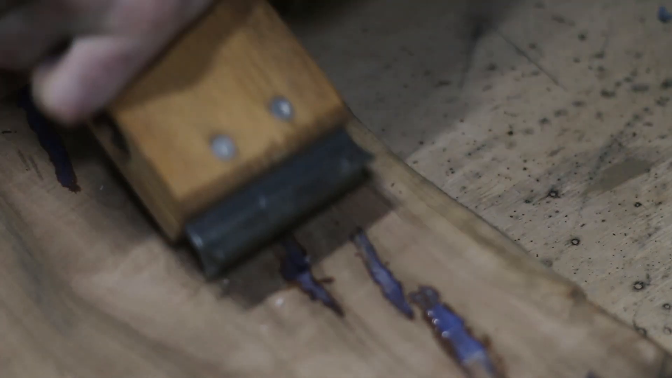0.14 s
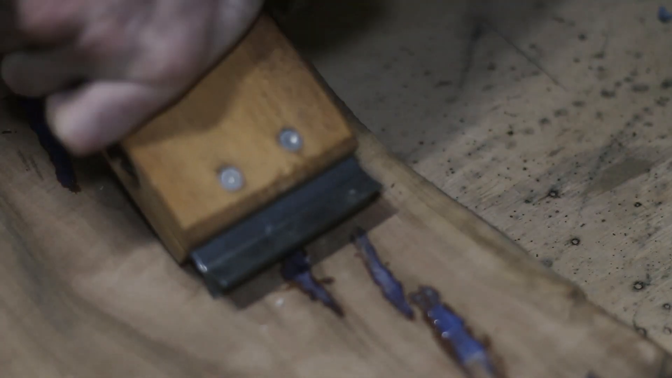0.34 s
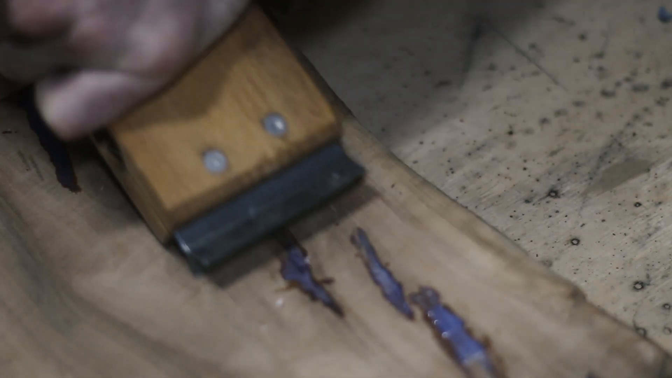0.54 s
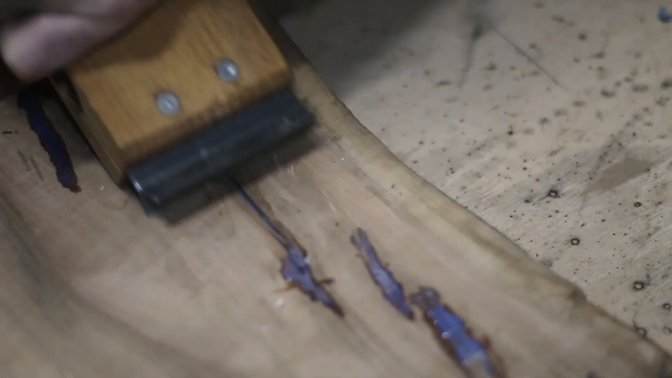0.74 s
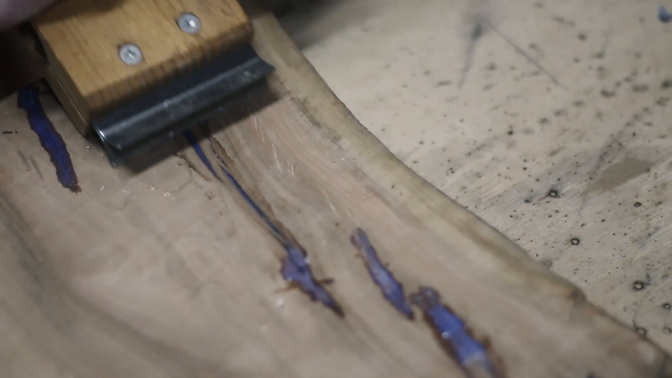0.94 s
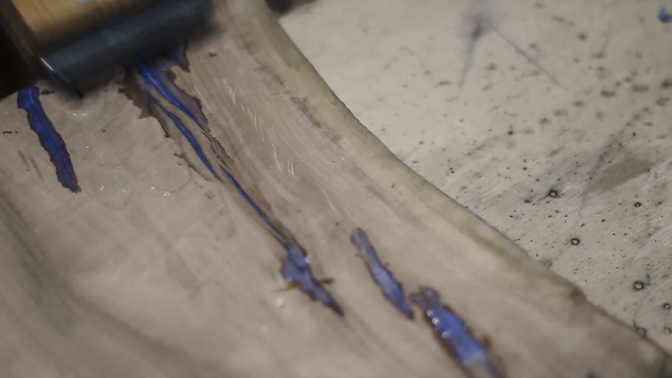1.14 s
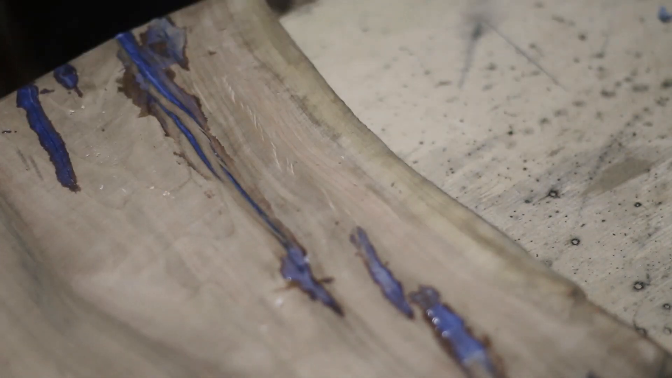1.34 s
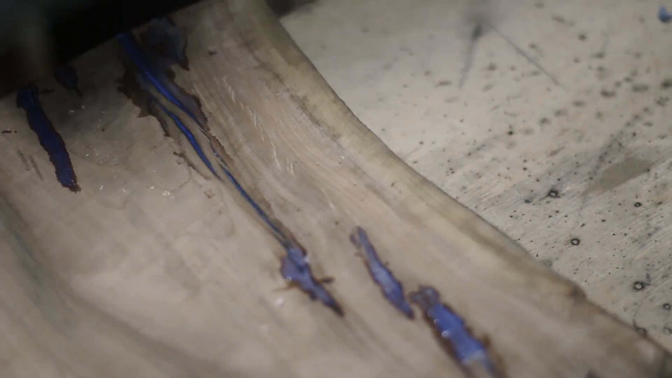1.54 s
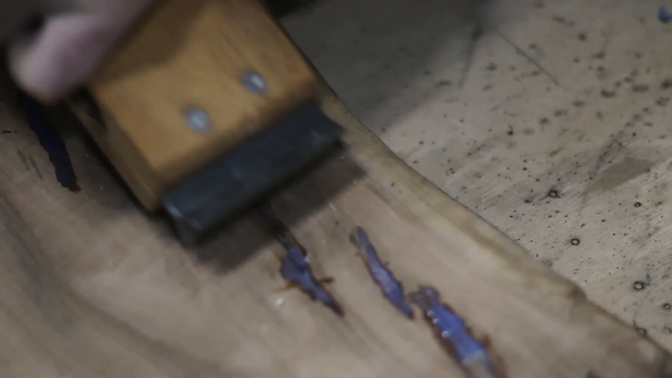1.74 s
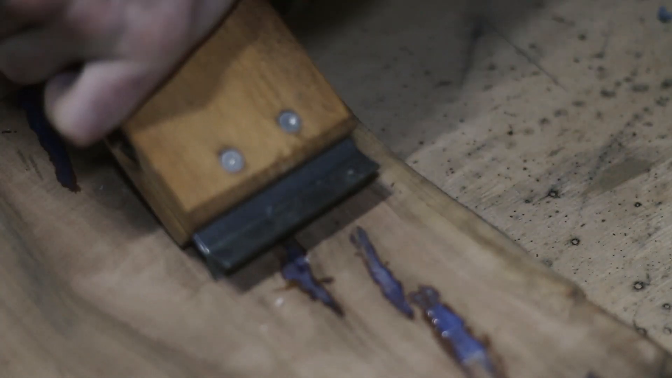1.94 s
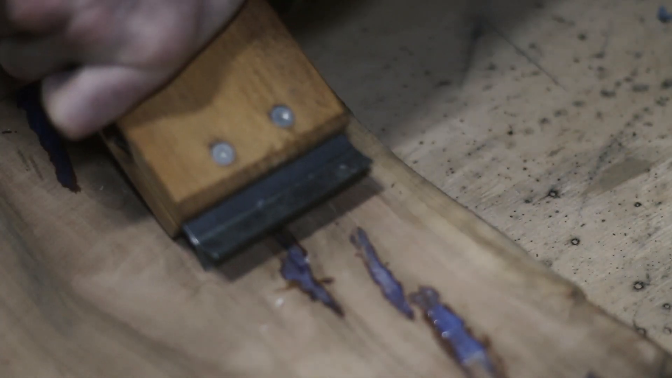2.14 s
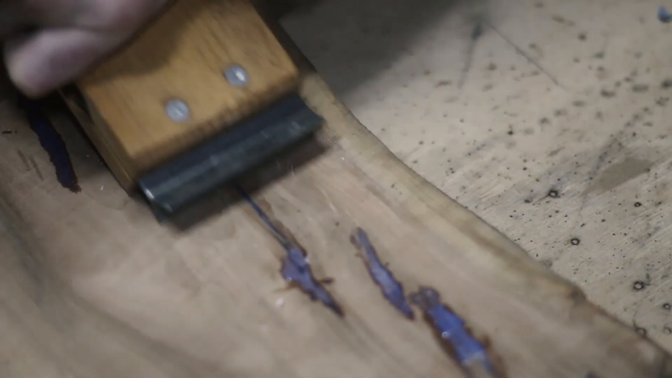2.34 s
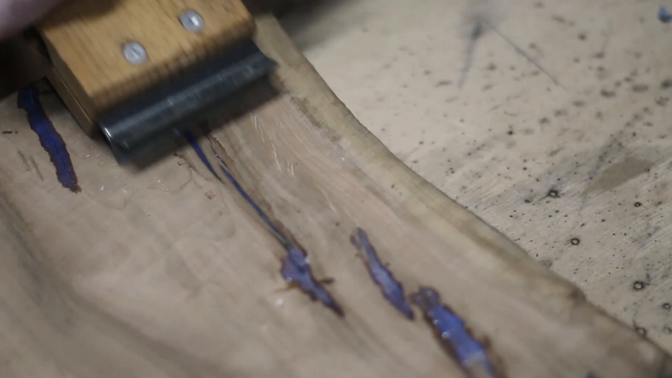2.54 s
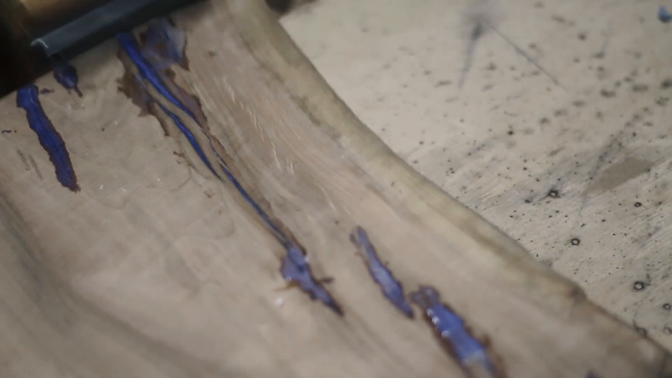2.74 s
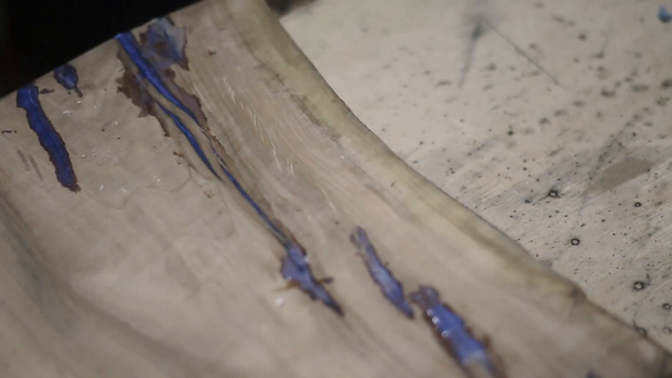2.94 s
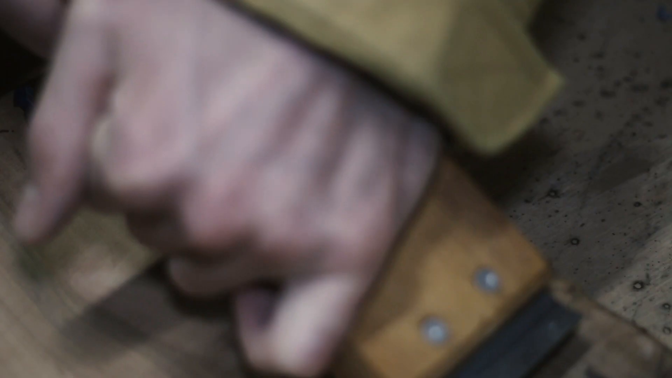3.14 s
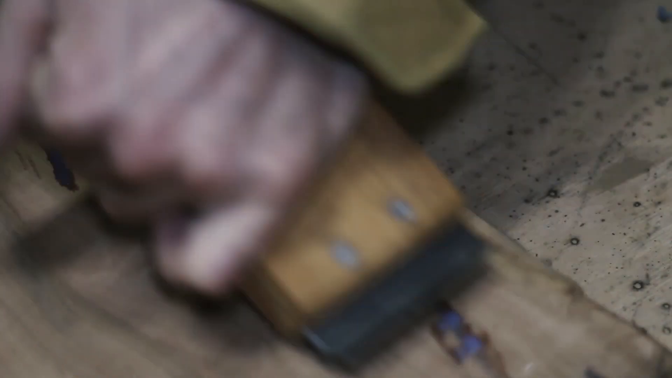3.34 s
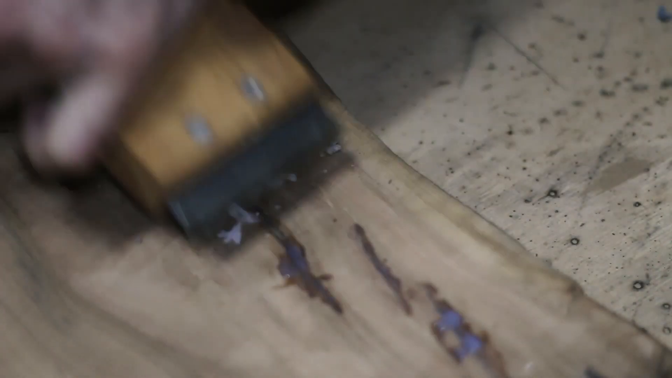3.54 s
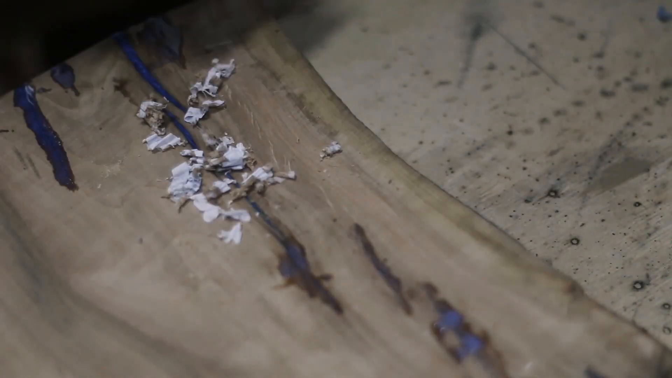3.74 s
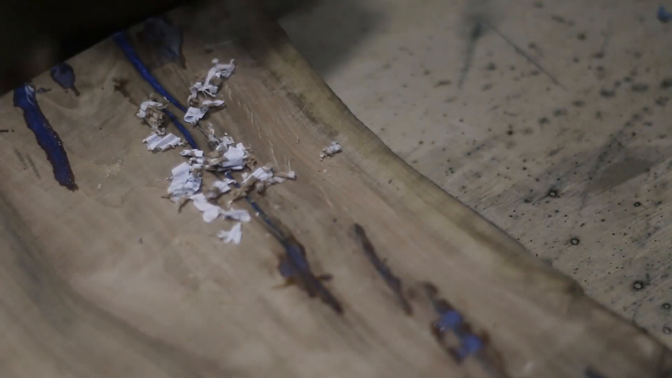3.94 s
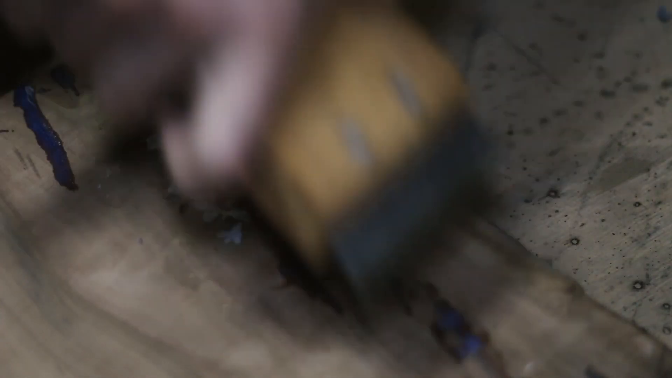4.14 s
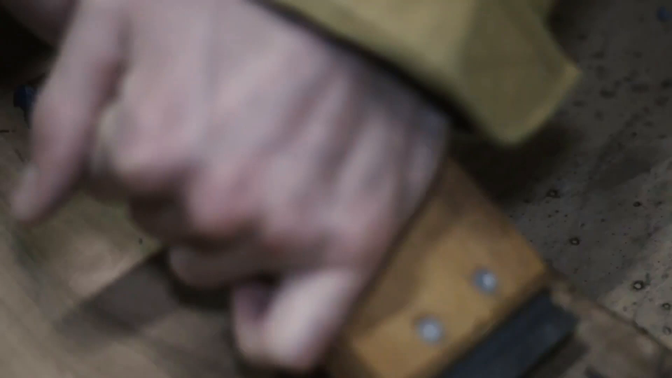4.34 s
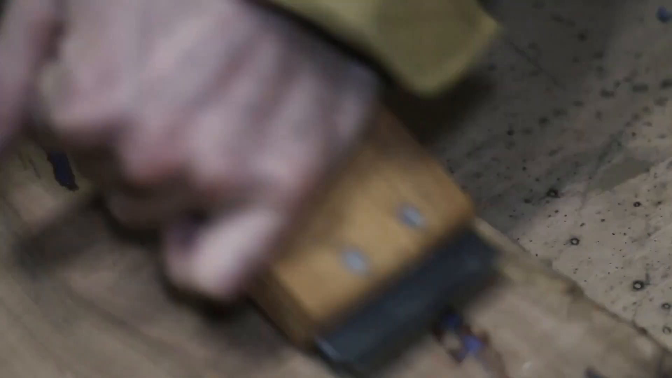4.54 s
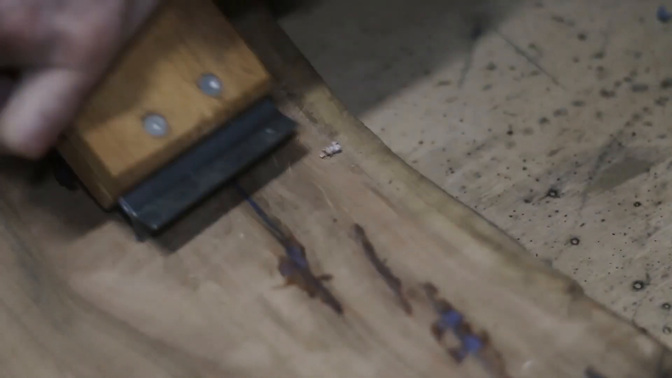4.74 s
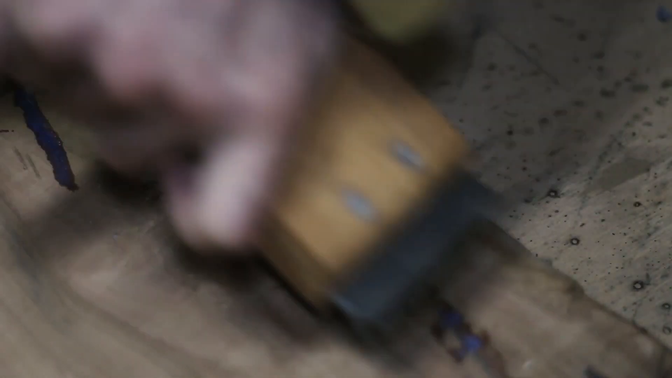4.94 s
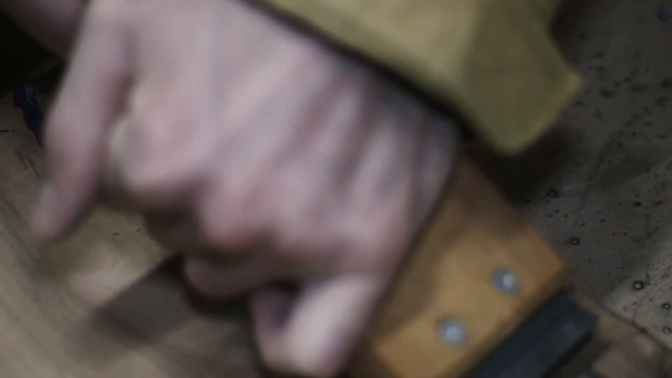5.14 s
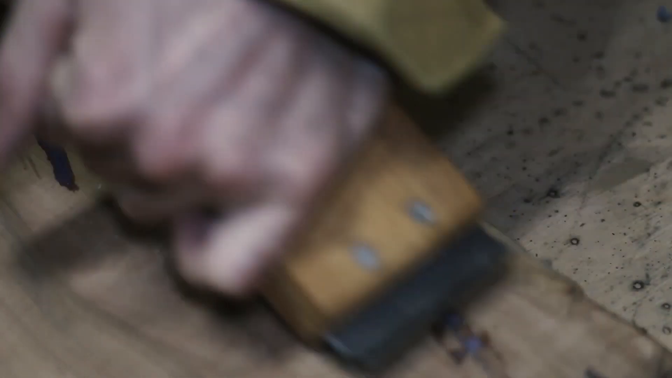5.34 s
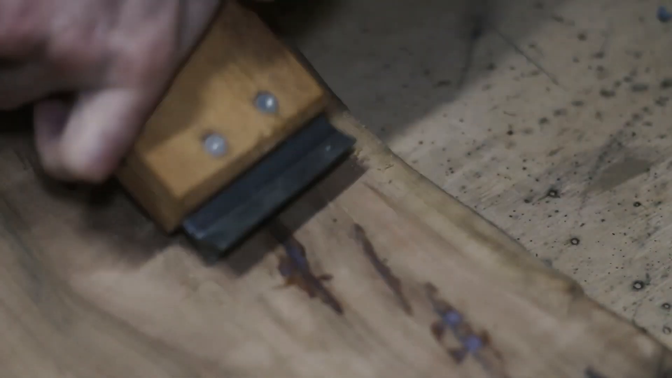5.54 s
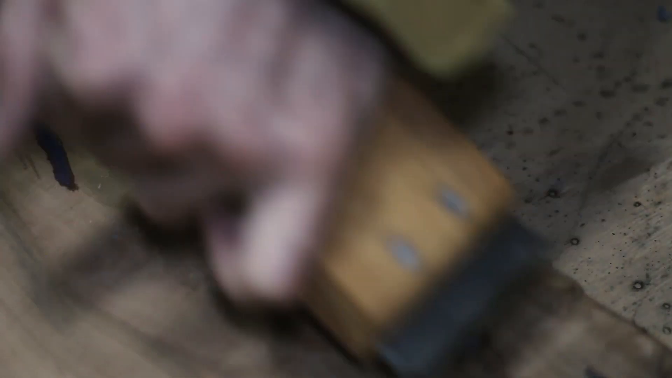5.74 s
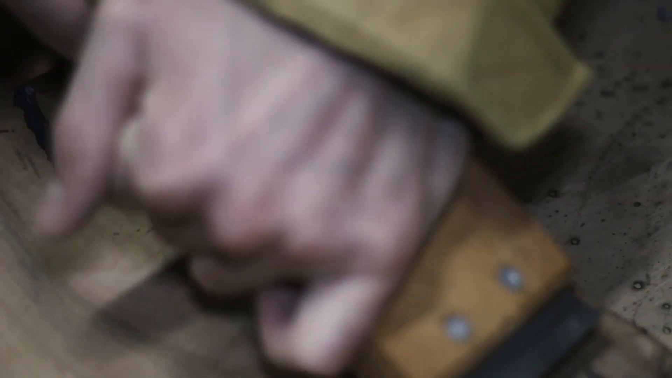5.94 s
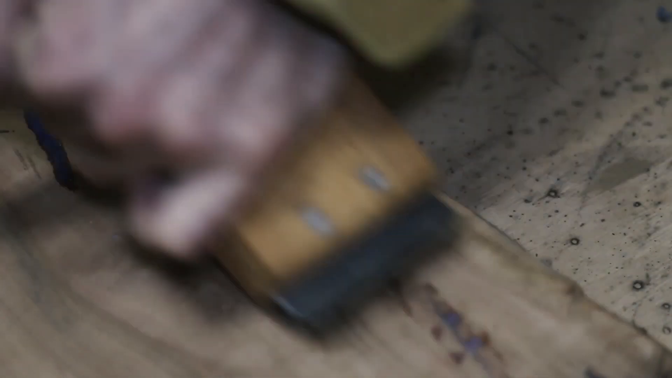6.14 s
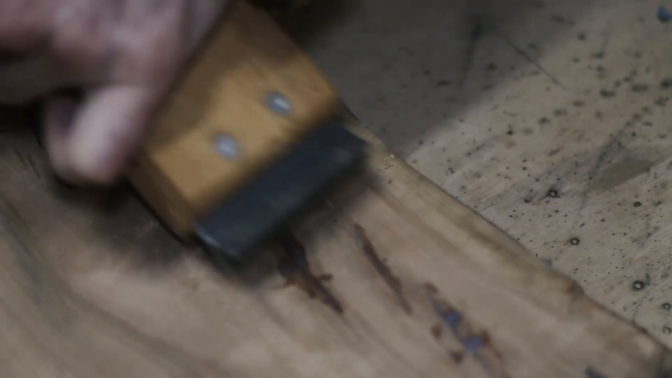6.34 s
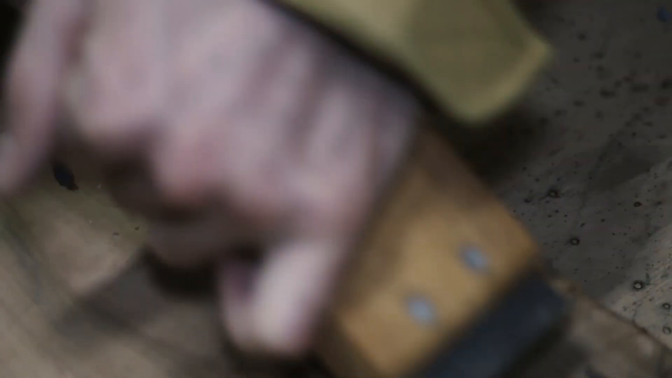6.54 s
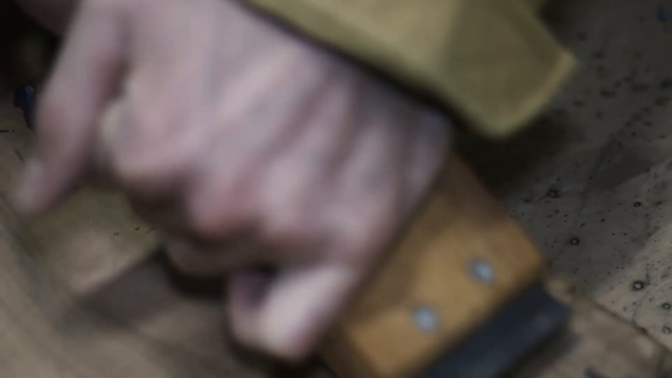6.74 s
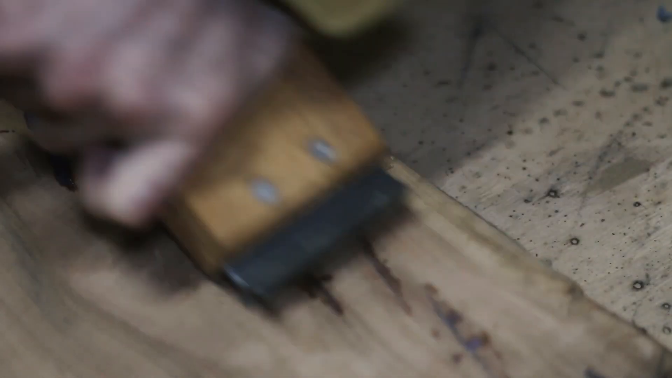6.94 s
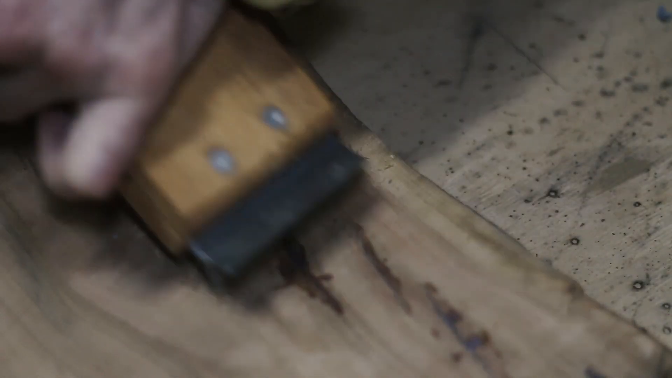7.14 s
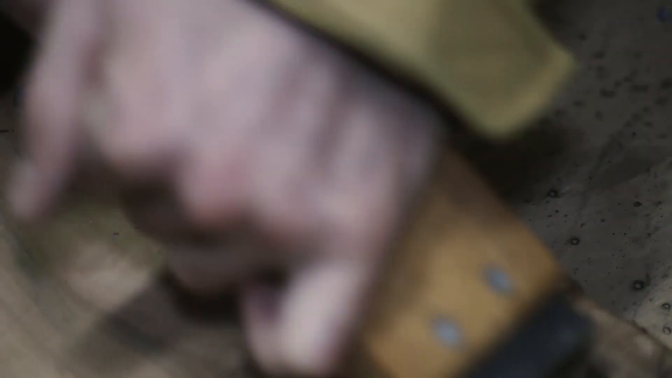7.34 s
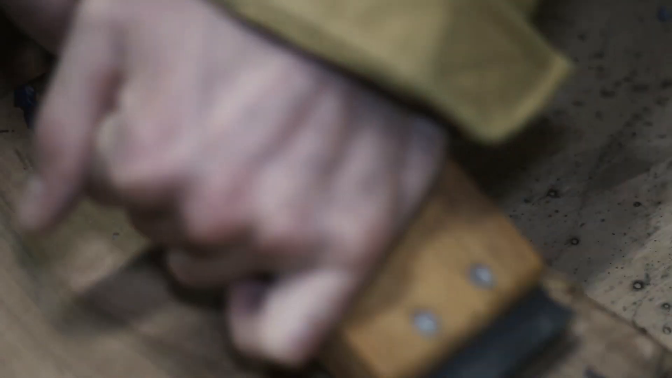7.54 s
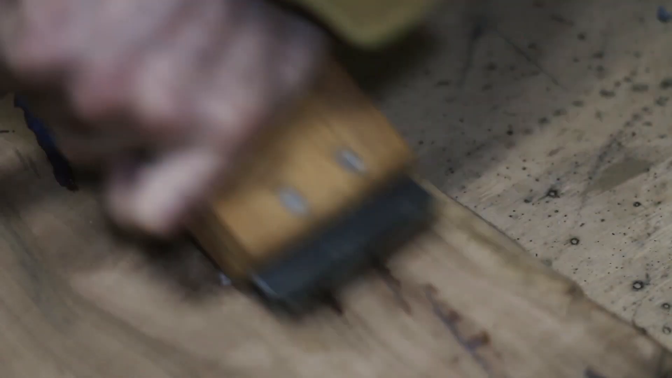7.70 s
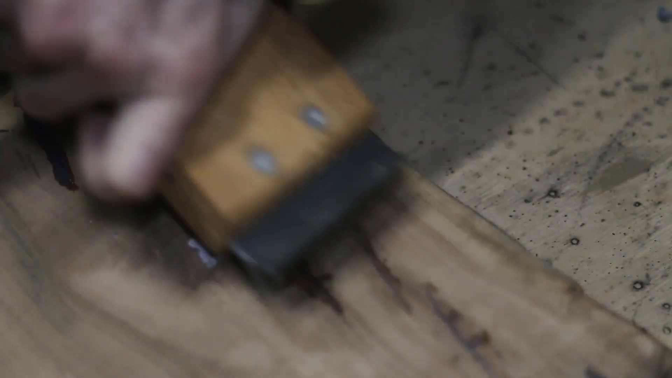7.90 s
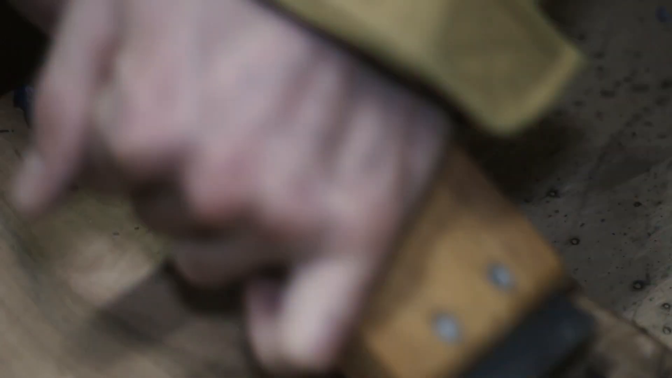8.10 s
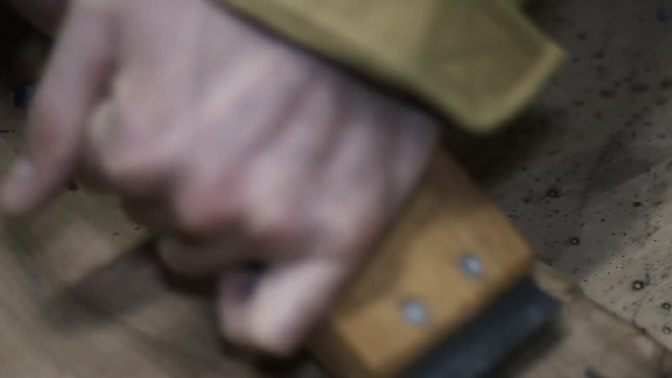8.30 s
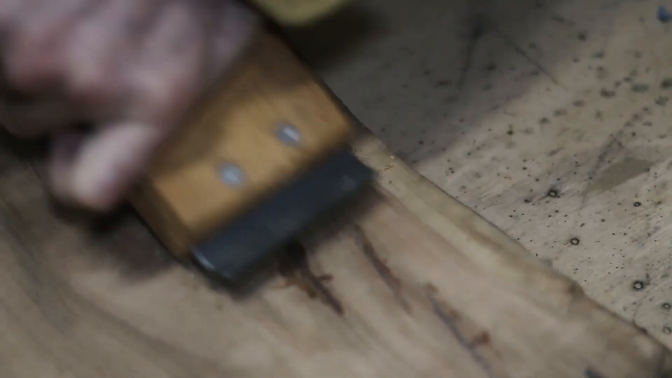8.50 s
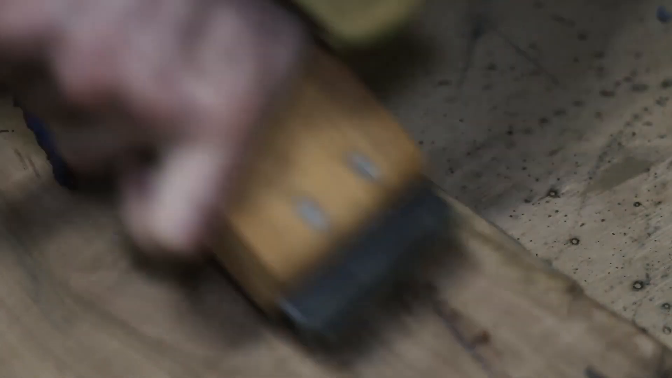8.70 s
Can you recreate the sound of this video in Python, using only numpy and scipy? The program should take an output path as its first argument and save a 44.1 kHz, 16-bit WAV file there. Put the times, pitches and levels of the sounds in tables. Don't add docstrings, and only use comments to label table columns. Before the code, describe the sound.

A steel scraper taps down and rasps across a wooden slab, two slow pulls ending in thuds, then seven quick harsh strokes in a workshop.

```python
import sys
import numpy as np
from scipy import signal
from scipy.fft import rfft, irfft, next_fast_len
from scipy.io import wavfile
from scipy.ndimage import uniform_filter1d, map_coordinates

SR = 44100
rng = np.random.default_rng(int(sys.argv[2]) if len(sys.argv) > 2 else 0)


def store_wav(level_fs):
    pcm = np.round(np.clip(np.atleast_2d(level_fs), -1, 1) * 32767)
    wavfile.write(sys.argv[1], SR, pcm.T.astype(np.int16))


def boost_factor(decibels):
    exponent = np.asarray(decibels, float) / 20
    return 10 ** exponent


N = 391166

# time in seconds, cutting speed in dB, bending of the blade in dB.
SLOW_PULLS = [
    [(.54, -79, -91), (.618, -44, -55), (.76, -42, -51.5), (.826, -42.5, -41.5), (1.085, -49, -42),
     (1.115, -41, -37.5), (1.2, -42.5, -33), (1.25, -38, -56), (1.3, -60, -64)],
    [(2.18, -68, -89), (2.266, -47, -57), (2.482, -41.5, -42.5), (2.546, -54, -47.5), (2.62, -43, -39.5),
     (2.756, -40.5, -40), (2.79, -38, -37.5), (2.84, -35.5, -94), (2.87, -61, -60)],
]
# time in seconds, peak in dB, low boom, high boom and wood in dB.
THUDS = [
    (1.2768, -13.5, -7.5, -8.5, -5),
    (2.8448, -16.5, -7, -10, -6),
]


def unit(x):
    return x / np.sqrt(np.mean(x ** 2) + 1e-20)


def along(points, hz):
    f, v = np.transpose(points)
    return np.interp(np.log(hz + 1), np.log(f + 1), v)


def curves(tables):
    t = np.arange(N) / SR
    s, *cols = np.concatenate(tables).T
    gate = 0
    for rows in tables:
        first, last = rows[0][0], rows[-1][0]
        gate = gate + np.interp(t, [first, first + 0.025, last - 0.02, last], [0, 1, 1, 0])
    return gate, *[np.interp(t, s, c) for c in cols]


def wobble(rate):
    knots = rng.standard_normal(int(N * rate / SR) + 4)
    return map_coordinates(knots, [np.arange(N) * rate / SR])


def fits(rows):
    t = np.arange(0, N / SR + 0.01, 0.001)
    swings = sum(db * np.clip(1 - np.abs(t - s) / half, 0, 1) for s, db, half in rows)
    return np.interp(np.arange(N) / SR, t, swings)


def add(out, start_s, sound):
    out[round(start_s * SR):][:len(sound)] += sound


def filtered(x, response):
    m = 2 * next_fast_len((N + SR // 2) // 2)
    return irfft(rfft(x, m) * response(np.fft.rfftfreq(m, 1 / SR)), m)[..., :N]


def spread(pair, alike, colour=lambda hz: 1):
    def turned(hz):
        turn = np.arccos(np.clip(along(alike, hz), -1, 1)) / 2
        return colour(hz) * np.array([np.cos(turn), np.sin(turn)])
    mid, side = filtered(pair, turned)
    return np.array([mid + side, mid - side])


def patchy(fine_db, broad_db, calm=1, lively=1):
    hz, t, z = signal.stft(rng.standard_normal((2, N)), SR, nperseg=256)

    def patches(bins, steps):
        rough = uniform_filter1d(rng.standard_normal(z.shape[1:]), size=bins, axis=0)
        return unit(uniform_filter1d(rough, size=steps, axis=1))

    hz = hz[:, None]
    depth = np.where((t < 3) & (hz < 4000), calm, np.where(hz > 4500, lively, 1))
    gain_db = depth * (fine_db * patches(3, 7) + broad_db * patches(8, 24))
    return signal.istft(z * boost_factor(gain_db), nperseg=256)[1][:, :N]


def body(spectrum, rings, lift_db, dips=()):
    def response(f):
        hollow = np.prod([1 - (1 - boost_factor(db)) / (1 + ((f - c) / w) ** 2) for c, w, db in dips], axis=0)
        peaks = sum(boost_factor(db + lift_db) * 1j * f * w / (c * c - f * f + 1j * f * w) for c, w, db in rings)
        return hollow * boost_factor(along(spectrum, f)) * (1 + peaks)
    return response


def ring(modes, t, attack, scatter_db):
    out = 0
    for hz, db, t60 in modes:
        level_db = db + scatter_db * rng.standard_normal() - 60 * t / t60
        out = out + boost_factor(level_db) * np.sin(2 * np.pi * hz * t)
    return out * (1 - np.exp(-t / attack))


def swells(rows, gain_db, rough, size, count):
    s, db, hz, half = np.transpose(rows)[..., None]
    t = np.arange(-count, count) / SR
    sway = rng.standard_normal((len(s), 2, len(t)))
    sway = uniform_filter1d(uniform_filter1d(sway, size=size), size=size)
    sway = rough * sway / sway.std()
    swell = boost_factor(db + gain_db - 6 * (t / (1.25 * half)) ** 4)
    tone = (1 + sway[:, 0]) * np.sin(2 * np.pi * hz * t) + sway[:, 1] * np.cos(2 * np.pi * hz * t)
    return np.bincount(np.round((s + t) * SR).astype(int).ravel(), (swell * tone).ravel(), N)


def background():
    # time in seconds, level in dB, swell in seconds, fade in seconds (per 20 dB).
    arm_moves = [(.03, -60, 0.32, 0.19), (.54, -61, 0.27, 0.03), (1.68, -62, 1.1, 0.46),
                 (3.801, -55, 1.3, 0.27), (4.06, -63, 0.063, 0.16), (4.3, -57.5, 0.25, 0.54),
                 (5.12, -63.5, 0.37, 0.74), (5.93, -63, 0.28, 0.032), (6.68, -62.5, 1.6, 0.23),
                 (7.44, -60.5, 0.27, 0.13), (8.2, -61.5, 1.1, 0.2), (8.86, -57.5, 0.33, .3)]
    # frequency in Hz, level in dB per Hz.
    cloth_colour = [(18, -54), (30, -13), (210, -14), (328, -1.5), (449, -6), (526, -5.5), (569, -6.5),
                    (1040, -6), (1320, -7.5), (3400, -11), (16000, -22)]
    # frequency in Hz, level in dB per Hz.
    hiss_colour = [(15, -29), (25, 2), (48, -4.5), (70, -7.5), (344, -17), (911, -18.5), (1400, -17),
                   (1840, -24.5), (9000, -27), (16000, -30)]
    # frequency in Hz, likeness of left and right (1 = the same).
    likeness = [(60, 0.79), (240, 0.89), (950, 0.91), (3770, 0.22), (15000, -0.36)]
    t = np.arange(0, N / SR + 0.01, 0.002)
    moves = 0
    for s, db, swell, fade in arm_moves:
        moves = moves + boost_factor(db - 20 * np.where(t < s, (s - t) / swell, (t - s) / fade))
    rustle = patchy(fine_db=1.5, broad_db=0.0) * boost_factor(0.3 * wobble(34))
    cloth = spread(rustle, likeness, lambda f: boost_factor(along(cloth_colour, f)))
    hiss = spread(rng.standard_normal((2, N)), likeness, lambda f: boost_factor(along(hiss_colour, f)))
    return np.interp(np.arange(N) / SR, t, moves) * unit(cloth) + boost_factor(-69.0) * unit(hiss)


def slab(t, low_db, knock_db, body_db, linger, grip_db=0):
    # frequency in Hz, level in dB, time to fall 60 dB in seconds.
    slab_modes = [(71.5, 2, 0.75), (103, 7, 0.21), (149.6, 8.5, 0.58), (199, -23, 0.27), (265.6, 5.5, 0.14),
                  (290.4, 0, 0.047), (334, -2.5, 0.27), (385.6, -7.5, 0.21), (450, -23, 0.2),
                  (512, 6, 0.075), (588, -4.5, 0.1), (650, 4, 0.11), (820, -6, 0.021), (860, -15, 0.29),
                  (988, -11.5, 0.093), (1006, 3.5, 0.14), (1184, -4.5, 0.19), (1486, 0, 0.1),
                  (1610, -3.5, 0.22)]
    out = 0
    for hz, db, t60 in slab_modes:
        flutter = map_coordinates(rng.standard_normal(200), [t * np.clip(hz / 3, 110, 480)], order=1)
        level = db + (low_db if hz < 190 else knock_db if hz < 460 else body_db)
        level += grip_db * (abs(hz - 1000) < 80)
        tone = ring([(hz, level, linger * t60)], t, 0.5 / hz, scatter_db=0.5)
        out = out + tone * (1 + (0.8 if hz < 600 else 1.3) * flutter)
    return out


def taps():
    # time in seconds, peak in dB, then thump, wood and brightness in dB against the peak.
    set_downs = [
        (0.3369, -19, -31.5, -20, -12.5),
        (2.0165, -28.5, -23.5, -15.5, -17),
        (3.198, -17.5, -28, -17.5, -4),
        (3.953, -44.5, -41, -34, -8),
        (4.4109, -13.5, -33.5, -21, -8.5),
        (5.22, -11.5, -37.5, -28, -8.5),
        (5.9568, -12, -32, -21.5, -15),
        (6.739, -13.5, -34, -18.5, -9),
        (7.5108, -23.5, -24.5, -14, -9),
        (8.2679, -11.5, -37, -19, -11),
    ]
    # shares of the four edge tones in dB, slab knock in dB.
    landings = [(4, 0.5, 4, -1, -3.5), (6, 2, 6, 0, -4.5), (-5.5, 3, 7.5, 5, -2.5), (7, -5, 0, -4, -3),
                (-7, 1.5, 6, 0, 5.5), (0, 3.5, -12, 8, 2.5), (1.5, 2, -1, -1, -5.5), (0, 2.5, 8, -8, -5),
                (5.5, 2, -0.19, -6, 4.5), (-0.5, 0.5, 3, -3, -2)]
    grip_rings = [-3, -5, 3.5, 0, -4, 11, 0.5, -1, -5.5, -1]
    # frequency in Hz, level in dB, time to fall 60 dB in seconds.
    edge_modes = [(2130, 4, 0.0055), (2655, 13, 0.0032), (3330, -6, 0.008), (4600, -3.5, 0.0058)]
    out, t = np.zeros(N + SR), np.arange(2 * SR // 5) / SR
    soft = signal.butter(3, 7000, fs=SR)
    woody = signal.butter(2, [900, 4200], "band", fs=SR)
    for tap, (*share_db, knock_db), grip_db in zip(set_downs, landings, grip_rings):
        s, db, thump_db, wood_db, bright_db = tap
        bend = 1 + 0.02 * rng.standard_normal(len(edge_modes))
        modes = [(b * hz, level + share, t60) for b, share, (hz, level, t60) in zip(bend, share_db, edge_modes)]
        edge = ring(modes, t, 0.0005, scatter_db=0)
        rattle = boost_factor(-60 * t / 0.019) + boost_factor(-2.5 - 60 * np.abs(t - 0.009) / 0.0045)
        crack = boost_factor(bright_db) * rattle * signal.lfilter(*soft, rng.standard_normal(len(t)))
        hush = boost_factor(-26 - 60 * t / 0.15) * signal.lfilter(*woody, rng.standard_normal(len(t)))
        wood = slab(t, thump_db, wood_db + knock_db + 2.0, wood_db - 0.8, linger=0.72, grip_db=grip_db)
        add(out, s, boost_factor(db - 5.5) * (edge + crack + hush + boost_factor(-2) * wood))
    return out[:N]


def snaps():
    per_s, least_db, spread_db = 500, 6, 8
    when, sign, size = rng.random((3, N))
    return (when < per_s / SR) * np.sign(sign - 0.5) * boost_factor(least_db + spread_db * size)


def slow(start_db, gain_db):
    landing_s, jolt_db, jolt_half_s = 0.092, -35.5, 0.014
    t = np.arange(3 * SR) / SR
    out = 0
    for rows in SLOW_PULLS:
        a, b = rows[0][0], rows[-1][0]
        levels_db = [start_db - 19.5, start_db, start_db + gain_db, -90]
        out = out + boost_factor(np.interp(t, [a, a + landing_s, b - 0.03, b], levels_db, -200, -200))
    for s, *_ in THUDS:
        out = out + boost_factor(jolt_db) * np.clip(1 - np.abs(t - s - 0.012) / jolt_half_s, 0, 1)
    return np.pad(out, (0, N - len(t)))


def quick(name):
    # time of the bite, run-up and hold in seconds, force in dB, bending of the blade in dB.
    pulls = [
        (3.371, 0.1, .24, -0.5, 4.5),
        (4.595, 0.17, 0.21, 1.5, 3.5),
        (5.372, 0.12, 0.23, -0.5, -1.5),
        (6.125, 0.15, 0.25, 0, 2.5),
        (6.904, 0.17, 0.22, 0, -2.5),
        (7.673, 0.14, 0.21, 0.5, -1.5),
        (8.427, 0.14, 0.2, 0.5, 2),
    ]
    ranges = {"air": (-36.5, 46.5, 3, 0.6, 86), "fizz": (-32, 35, 1.5, 11, 0),
              "blade": (-39.5, 34.5, 1.42, 1.5, 51), "grip": (-34, 29, 1.1, 9, -1),
              "slab": (-35, 22, 1, 8, 29)}
    lags = {"air": .13, "fizz": .05, "blade": .065, "grip": .005, "slab": 0}
    drop_off_s, lift_db_per_s, lift_s = 0.032, 322, 0.2
    out, lag = np.zeros(N), lags[name]
    peak_db, touch_db, bend, drop_db, sag = ranges[name]
    for s, run_up, hold, force_db, flex_db in pulls:
        first = round((s - run_up) * SR)
        count = len(out[first:][:round((run_up + hold + lift_s) * SR)])
        t = np.arange(count) / SR - run_up
        before = np.clip((lag - t) / (run_up + lag), 0, 1)
        after = np.clip(t - lag, 0, None)
        db = peak_db + force_db + (name == "blade") * flex_db - touch_db * before ** bend
        db = db - drop_db * (1 - np.exp(-after / drop_off_s)) - sag * after
        db = db - lift_db_per_s * np.clip(t - hold, 0, None)
        out[first:][:count] += boost_factor(db) * signal.windows.tukey(count, 0.1)
    return out


def scrape():
    # frequency in Hz, likeness of left and right (1 = the same).
    likeness = [(60, 1), (180, 0.92), (550, 0.97), (1650, 0.83), (4970, 0.6), (9000, 0.92), (15000, 0.27)]
    # frequency in Hz, level in dB per Hz.
    quick_colour = [(29, -55), (50, -10), (198, -18), (389, -6.5), (765, -11.5), (884, -10), (1100, -13),
                    (1540, -4.5), (2320, -9.5), (2810, -5), (3670, -14), (7760, -18.5), (16000, -35.5)]
    slow_colour = [(29, -57.5), (50, -23), (128, -12.5), (264, -13), (398, -4.5), (765, -11), (863, -5.5),
                   (1070, -7.5), (1210, 3.5), (1870, -0.5), (2320, -4.5), (2750, -4.5), (3580, -14),
                   (7950, -22), (16000, -31.5)]
    # frequency in Hz, width in Hz, level in dB.
    quick_rings = [(392, 8.4, 3), (523, 24, 0.5), (896, 21, -7.5), (1257.5, 21, 2.5), (1520, 9.5, -16),
                   (2107, 34, -9.5), (2830, 41, -25), (3290, 51, -3), (4970, 730, -6), (5980, 95, -4.5),
                   (6740, 47, -12), (8400, 23, -18), (9000, 180, -17)]
    slow_rings = [(367, 22, -4), (920, 20, -24), (1310, 16, -5), (1795, 130, 4.5), (2760, 82, 1),
                  (2900, 50, -4), (3200, 47, 4), (4000, 42, -20), (4710, 420, -11), (5830, 150, 3.5),
                  (6770, 10, -14), (7920, 70, 8), (8400, 22, -11.5)]
    # frequency in Hz, half width in Hz, level in dB.
    quick_dips = [(2330, 100, -7.5), (3520, 150, 2)]
    slow_dips = [(1110, 50, -5.5), (2345, 63, -21), (3680, 105, -12)]
    # time in seconds, level in dB, half length in seconds.
    sings = [(1.185, -5, .025), (1.245, 1, .02), (2.81, -5, 0.012), (3.345, 13, 0.053), (3.48, 3.5, .04),
             (3.57, -4, 0.053), (4.62, -4, 0.011), (4.83, 21, 0.028), (5.37, -1, 0.039), (5.515, 8, 0.04),
             (6.115, -8, 0.026), (6.163, 9, 0.013), (6.235, 7.5, 0.022), (6.925, 10, 0.01),
             (6.975, 7.5, 0.086), (7.69, 8, 0.032), (7.77, 6, .05), (8.495, 6.5, 0.029)]
    # time in seconds, tearing lost in dB, half length in seconds.
    skids = [(6.125, -1.5, 0.031), (6.86, -2.5, 0.028), (7.67, 1.5, 0.043), (7.88, -3.5, 0.16),
             (8.44, 2.5, .06), (.645, -1, .04), (.716, 7, 0.073), (.83, -0.5, 0.059), (.9, 7, 0.069),
             (1.02, -3, 0.035), (1.07, 5, 0.03), (2.35, 0, .04), (2.4, 8, 0.042), (2.455, 1, 0.026),
             (2.66, 2.5, 0.031), (2.72, 9.5, 0.065), (3.325, -3.5, 0.043), (3.42, 8, 0.07),
             (4.56, 7.5, 0.19), (5.345, -1, 0.031), (5.45, 5, 0.023), (5.64, -8, 0.036),
             (6.178, 13.5, 0.041), (6.232, 1, 0.035), (6.32, -3.5, 0.049), (6.933, 9, 0.037),
             (7.56, -12.5, 0.04), (7.74, 5, 0.079)]
    t = np.arange(N) / SR
    light = np.arange(N) < 3 * SR

    gate, speed_db, flex_db = curves(SLOW_PULLS)
    clumps = boost_factor(1.0 * wobble(70) + 0.71 * wobble(170) + 0.34 * wobble(450))
    force = spread(patchy(fine_db=2.0, broad_db=1.8, calm=0.42, lively=0.99) * clumps, likeness)
    force = force + snaps() * np.where(light, 0.9, 1)
    slow_rasp = unit(filtered(force, body(slow_colour, slow_rings, lift_db=-7.5, dips=slow_dips)))
    quick_rasp = unit(filtered(force, body(quick_colour, quick_rings, lift_db=4.5, dips=quick_dips)))
    rasp = np.where(light, slow_rasp, quick_rasp)

    settle = sum((t > s) * boost_factor(-50.5 - 60 * np.abs(t - s) / 0.68) for s, *_ in THUDS)
    tear = boost_factor(-fits(skids))
    bright_db = speed_db - 2.5 + 0.72 * (speed_db + 40.5)
    air = tear ** 0.98 * gate * boost_factor(bright_db) + tear * quick("air") + boost_factor(-5) * settle
    fizz = tear * gate * boost_factor(speed_db - 1) + tear * quick("fizz") + settle
    blade = boost_factor(fits(sings)) * (gate * boost_factor(flex_db) + quick("blade"))
    grip = slow(-51, -13) * boost_factor(0.65 * np.clip(speed_db + 47, -8, 4)) + tear * quick("grip")
    wood = slow(-51, 4) + tear ** 0.39 * quick("slab")

    edges_hz = np.array([1e5, 7000, 3800, 2350, 1050, 1])[:, None, None]

    def split(f):
        above = 1 / (1 + (edges_hz / (f + 1)) ** 12)
        return np.sqrt(np.abs(np.diff(above, axis=0)))

    out = 0
    for gain, part, chatter_db in zip([air, fizz, blade, grip, wood], filtered(rasp, split), [1.6, 2.0, 2.4, 1.4, 1.2]):
        part = part * boost_factor(chatter_db * np.where(light, 0.5, 1) * wobble(45))
        out = out + gain * np.where(light, unit(part * light), unit(part * ~light)) * 0.65
    return out


def squeaks():
    # time in seconds, level in dB, frequency in Hz, half length in seconds.
    stutters = [(0.809, -38, 2720, 0.0026), (0.83, -44.5, 2660, 0.0044), (0.872, -34, 2670, 0.007),
                (0.944, -35, 2650, 0.007), (0.986, -33, 2890, 0.0062), (1.042, -35.5, 2950, 0.0036),
                (1.095, -34, 2880, 0.004), (1.11, -46, 2740, 0.0084), (1.13, -34, 4910, 0.0056),
                (1.1474, -33, 2760, 0.0047), (1.1648, -33, 3290.0, 0.011), (1.1658, -48, 2900, 0.0071),
                (1.2708, -37, 5100, 0.0023), (2.4416, -45, 2800, 0.0064), (2.472, -32, 2700, 0.003),
                (2.6313, -44, 2740, 0.0032), (2.683, -34, 3210, 0.0061), (2.6835, -43, 2880, 0.0071),
                (2.78, -32, 4660, 0.0032), (3.404, -26, 2810, 0.0026), (3.4255, -26.5, 2740, 0.0077),
                (3.4412, -33, 2720, 0.0038), (3.443, -26, 3190, 0.0029), (4.6117, -24, 3244, 0.0044),
                (4.615, -29, 4900, 0.0031), (4.6153, -24.5, 2820, 0.0041), (4.645, -22.5, 3380, 0.0031),
                (4.8219, -35, 2760, 0.0034), (5.407, -28, 2830, 0.005), (5.4253, -31, 4910.0, 0.0046),
                (5.4493, -23, 2900, 0.0032), (5.456, -29, 5040, 0.0024), (5.4745, -29, 2830, 0.011),
                (5.5045, -31, 2800, 0.0034), (5.507, -35, 2800, 0.0045), (6.1627, -22.5, 2820, 0.0041),
                (6.164, -29.5, 3140, 0.006), (6.202, -23.5, 2800, 0.0032), (6.2336, -37, 2760, 0.0049),
                (6.2456, -24, 2800, 0.0022), (6.256, -29, 2780, 0.0029), (6.9183, -26.5, 4920, 0.0041),
                (6.9214, -29, 2837, 0.0068), (6.9594, -27.5, 4850, 0.0042), (6.9842, -28.5, 2780, 0.0027),
                (7.7129, -20, 4960, 0.0027), (7.753, -27.5, 2800, 0.0031), (8.454, -34, 4960, 0.0063),
                (8.487, -32, 4980, 0.004), (8.5002, -29, 2800, 0.0052)]
    return swells(stutters, gain_db=-4, rough=0.55, size=20, count=1200)


def gap():
    # time in seconds, frequency in Hz, level in dB.
    closings = [
        [(1.14, 2107, -45), (1.165, 1900, -32), (1.2, 2043, -30), (1.212, 3100, -28), (1.236, 3900, -37)],
        [(1.237, 5640, -47), (1.272, 6100, -24.5), (1.29, 6040, -43)],
        [(2.74, 4225, -47), (2.785, 4600, -30.5), (2.8, 5680, -40), (2.845, 6320, -32), (2.87, 6500, -57)],
        [(3.372, 1856, -40), (3.393, 1998, -24), (3.408, 3070, -38), (3.424, 4190, -38)],
        [(3.425, 1910, -32), (3.437, 2340, -20), (3.446, 4220, -29), (3.47, 6210, -48)],
        [(5.39, 1187, -47), (5.413, 1600, -32), (5.426, 2250, -31.5), (5.445, 2830, -47)],
    ]
    # frequency in Hz, width in Hz, level in dB.
    woken = [(1600, 90, -3.5), (1860, 80, 5.5), (2154, 64, 6.5), (2800, 120, -20), (3160, 120, 4),
             (4700, 180, 5), (5760, 97, -8), (6130, 120, 0.5)]
    gate, hz, db = curves(closings)
    sway = filtered(rng.standard_normal((2, N)), lambda f: 1 / (1 + (f / 420) ** 3))
    phase = 2 * np.pi * np.cumsum(hz * (1 + 0.035 * wobble(150))) / SR
    band = sway[0] * np.cos(phase) + sway[1] * np.sin(phase)
    band = gate * boost_factor(db) * unit(band * boost_factor(1.5 * wobble(200)))
    return boost_factor(-6) * filtered(band, body([(1, 0)], woken, lift_db=1))


def hums():
    # time in seconds, level in dB, frequency in Hz, half length in seconds (at 3.955 s only a bright
    held = [(1.195, -45, 1850, 0.01), (1.21, -37, 2960, 0.013), (1.224, -38, 3720, 0.02),
            (1.26, -40, 3040, .015), (2.4, -52, 4440, .06), (2.467, -42, 2800, 0.017),
            (2.65, -44, 4300, .035), (2.777, -37, 3220, .011), (2.793, -38, 3750, .013),
            (2.797, -41, 5880, 0.015), (3.35, -41, 4800, 0.02), (3.407, -35, 4020, 0.011),
            (3.49, -37, 2857, 0.016), (3.522, -45.5, 5840, 0.027), (3.955, -53, 9000, 0.00021),
            (3.955, -58, 13100, .0002), (4.651, -34, 4050, .005), (4.684, -40.5, 2750, 0.011),
            (4.81, -42.5, 5030, .03), (4.83, -39, 2610, 0.016), (5.39, -39, 6250, .018),
            (5.424, -37, 3290, 0.0087), (5.495, -40, 3384, .023), (5.53, -47.5, 1266, 0.023),
            (6.273, -39, 3080, 0.021), (6.318, -39, 3090, .006), (6.967, -38.5, 3330, 0.0084),
            (7.029, -37, 7500, .013), (6.32, -37, 5230, .012), (7.687, -37, 1500, 0.014),
            (7.77, -43, 3340, 0.027), (7.795, -35.5, 2810, 0.01), (7.859, -39, 4830, 0.015),
            (7.908, -43.5, 3120, 0.0052), (8.405, -43.5, 936, 0.014), (8.475, -40, 4900, 0.019),
            (8.62, -42, 3200, 0.014)]
    return swells(held, gain_db=-4, rough=1.3, size=64, count=5000)


def thuds():
    # frequency in Hz, level in dB, time to fall 60 dB in seconds.
    push = [
        (370, 11.5, 0.016),
    ]
    out, t = np.zeros(N + SR), np.arange(2 * SR // 5) / SR
    dense = signal.butter(2, [150, 800], "band", fs=SR)
    for s, db, *_, wood_db in THUDS:
        rumble = boost_factor(3.5 - 60 * t / 0.53) * signal.lfilter(*dense, rng.standard_normal(len(t)))
        slap = boost_factor(8 - 60 * np.abs(t - 0.002) / 0.025) * uniform_filter1d(rng.standard_normal(len(t)), size=6)
        wood = slab(t, -26.0, wood_db, wood_db - 12.5, linger=1.36)
        blow = ring(push, t, 0.0015, scatter_db=-2)
        add(out, s, boost_factor(db - 13.0) * (wood + slap + rumble - blow))
    return out[:N]


def bench():
    # frequency in Hz, time to fall 60 dB in seconds.
    frame = [(102, 0.7), (150, 1)]
    out, t = np.zeros(N + SR), np.arange(SR // 2) / SR
    for s, db, *boom_db, _ in THUDS:
        modes = [(hz, level, t60) for (hz, t60), level in zip(frame, boom_db)]
        boom = ring(modes, t, 0.17, scatter_db=-3.0) * np.exp(-(t / 0.16) ** 2)
        add(out, s, boost_factor(db + 1) * boom)
    return out[:N]


def catches():
    # time in seconds, peak in dB, frequency in Hz, time to fall 60 dB in seconds.
    resin = [
        (2.7309, -13, 4600, 0.0038),
        (3.4418, -17, 3900, 0.005),
    ]
    out, t = np.zeros(N + SR), np.arange(2 * SR // 5) / SR
    for s, db, hz, t60 in resin:
        tick = ring([(hz, 0, t60), (1.08 * hz, -3, t60)], t, 13 * t60 ** 2, scatter_db=0)
        add(out, s, boost_factor(db + 1.5) * tick)
    return out[:N]


def shop(x):
    # frequency in Hz, time to fall 60 dB in seconds.
    decay = [(100, 0.45), (500, 0.37), (2000, 0.6), (6000, 0.28), (14000, 0.36)]
    # frequency in Hz, level in dB.
    wall_tone = [(110, 3.5), (350, 3.5), (3000, -5), (9000, -6)]
    # frequency in Hz, likeness of the tail at left and right.
    likeness = [(200, 1), (700, 0.96), (2000, 0.28), (8000, 0.028)]
    # delay in seconds, level in dB.
    echoes = [(0.017, -13), (0.0086, -17.5), (0.0075, -20), (0.016, -28)]
    out, hop = np.zeros((2, N + 2 * SR)), SR // 2
    for start in range(0, N, hop):
        hz, t, (a, b) = signal.stft(rng.standard_normal((2, 2 * SR // 3)), SR, nperseg=256)
        alike = np.clip(along(likeness, hz), 0, 1)[:, None]
        z = np.array([a, alike * a + np.sqrt(1 - alike ** 2) * b])
        fade_db = along(wall_tone, hz)[:, None] - 60 * t / along(decay, hz)[:, None]
        tail = signal.istft(z * boost_factor(fade_db), SR, nperseg=256)[1]
        tail = np.pad(boost_factor(-8.0) * tail / np.linalg.norm(tail[0]), ((0, 0), (150, 0)))
        for s, db in echoes:
            tail[:, round(s * SR)] += boost_factor(db)
        wet = signal.fftconvolve(x[None, start:start + hop], tail, axes=1)
        out[:, start:start + wet.shape[1]] += wet
    return out[:, :N]


def scene():
    rasp, wedge, hum = scrape() * boost_factor(-1.0), gap(), hums()
    points = taps() + catches() + thuds() + squeaks()
    wet = shop(boost_factor(-1.0) * points + rasp.mean(axis=0) + (wedge + hum) / 2)
    return rasp + wedge + hum + points + wet + bench() + background()


def causal(gain):
    ceps = irfft(np.log(gain(np.fft.rfftfreq(16384, 1 / SR)) + 1e-6))
    half = ceps.shape[-1] // 2
    ceps[..., 1:half] *= 2
    ceps[..., half + 1:] = 0
    return irfft(np.exp(rfft(ceps)))[..., :half // 2]


def low_pass(x):
    return signal.sosfilt(signal.butter(12, 15800, fs=SR, output="sos"), x)


def record(dry):
    # frequency in Hz, level in dB.
    mic_tone = [(20, -19), (45, -4.5), (70, -0.5), (10000, 0), (13000, -5), (15000, -0.5), (16400, -18)]
    # frequency in Hz, left minus right in dB.
    lean = [(60, -4), (130, -4), (290, -3), (640, -1.5), (1410, -3), (3100, -5), (6820, -3.5), (15000, 1.5)]
    # frequency in Hz, radians by which left leads.
    lead = [(0, 0.28), (2150, -0.53), (3450, 0.97), (5000, -0.93), (8100, 0.51), (13400, 1), (16000, 0.076)]
    side = np.array([[0.5], [-0.5]])
    pulse = causal(lambda f: boost_factor(along(mic_tone, f) + along(lean, f) * side))

    def ports(f):
        turn = uniform_filter1d(along(lead, f), size=6000) * side
        return rfft(pulse, 2 * len(f) - 2) * np.exp(1j * turn)

    return low_pass(filtered(dry, ports))


dry = scene()
out = record(dry)
store_wav(out)
```